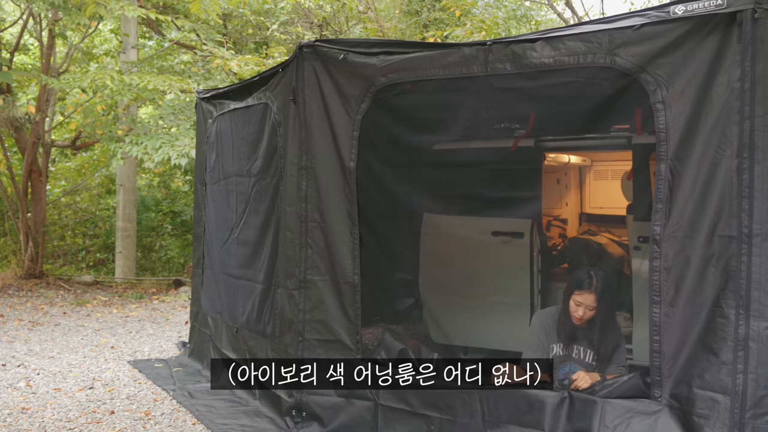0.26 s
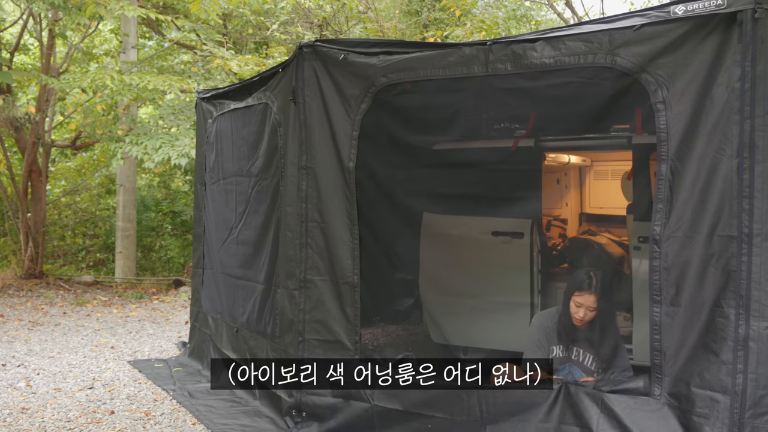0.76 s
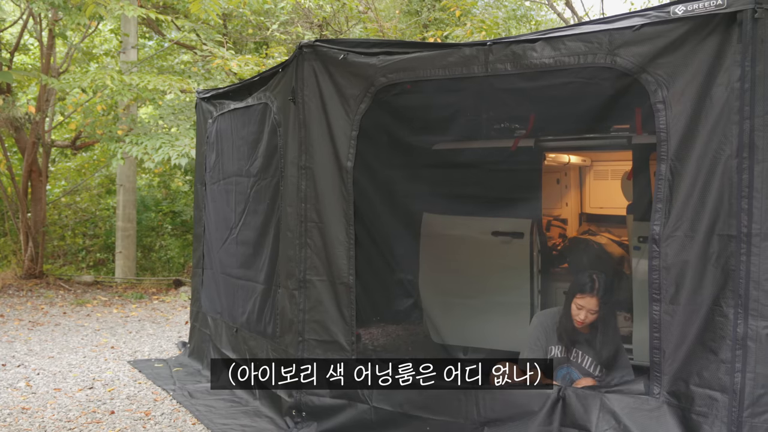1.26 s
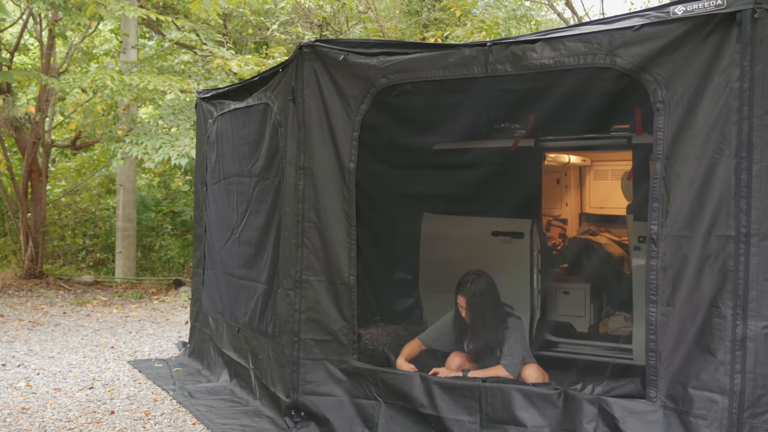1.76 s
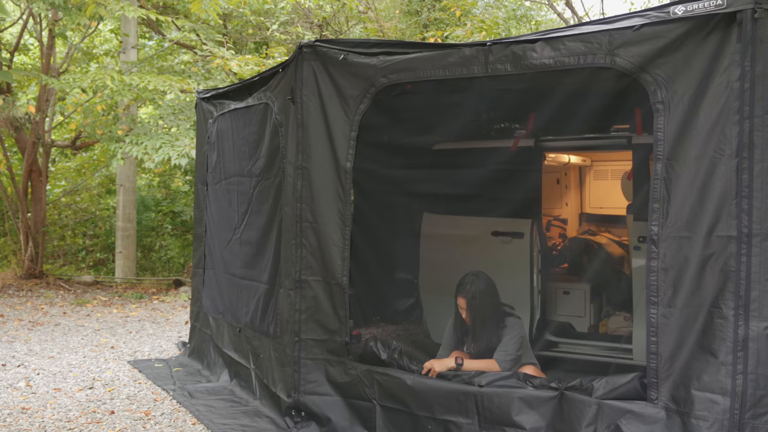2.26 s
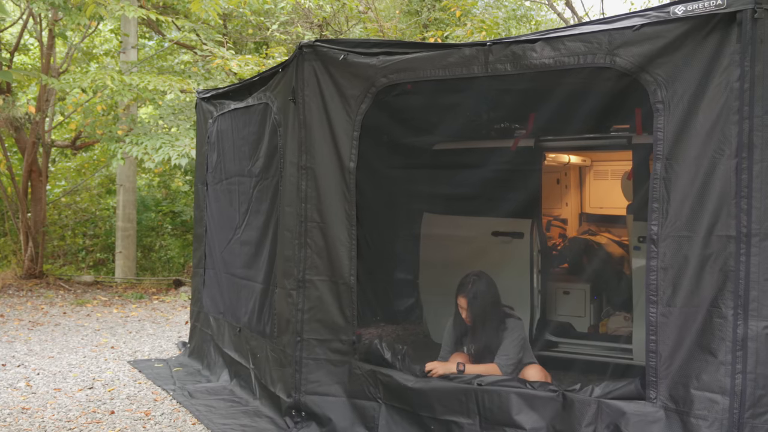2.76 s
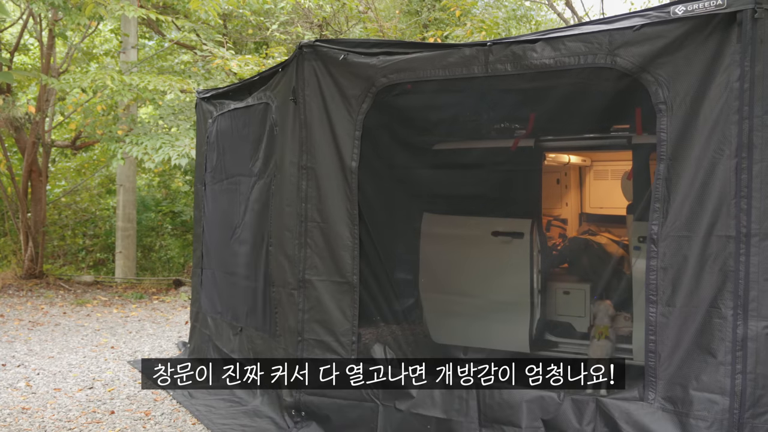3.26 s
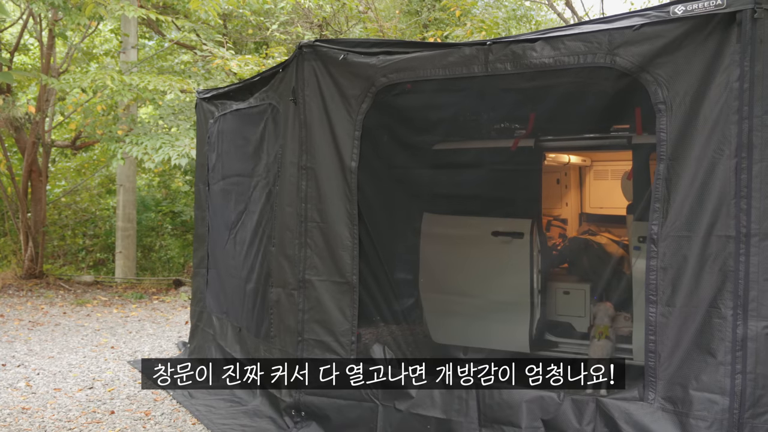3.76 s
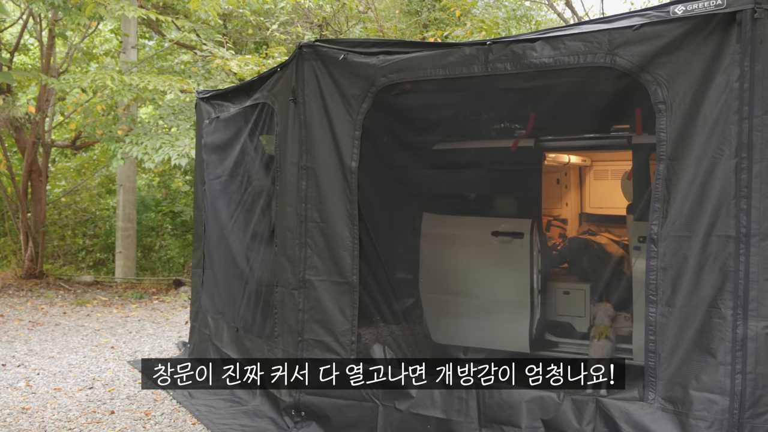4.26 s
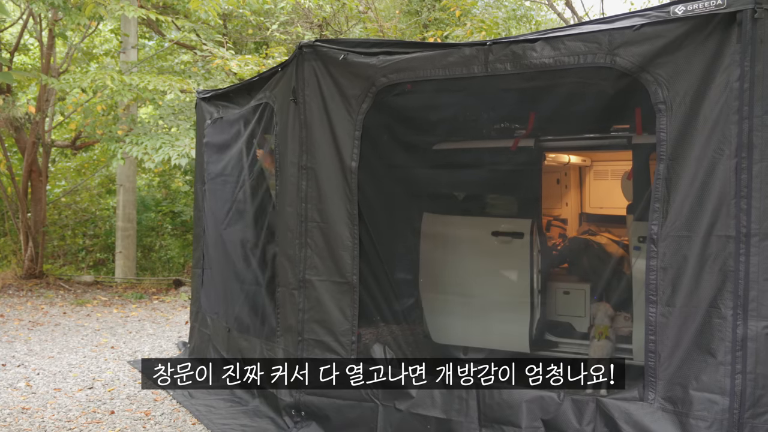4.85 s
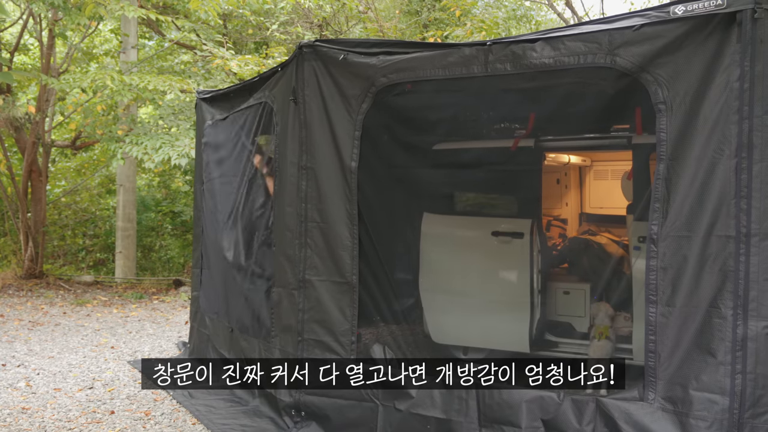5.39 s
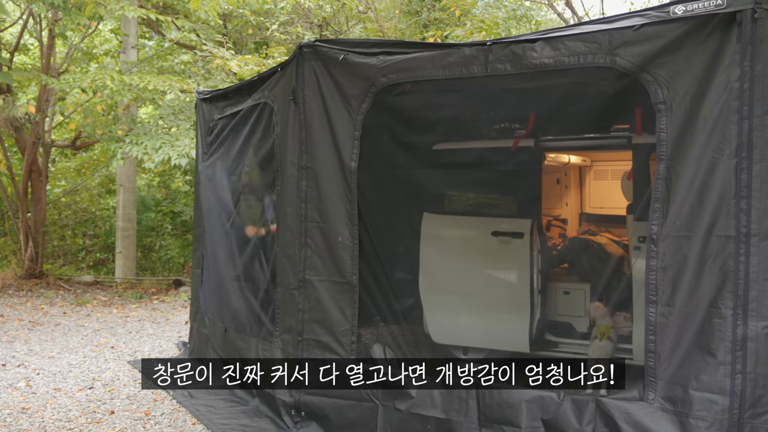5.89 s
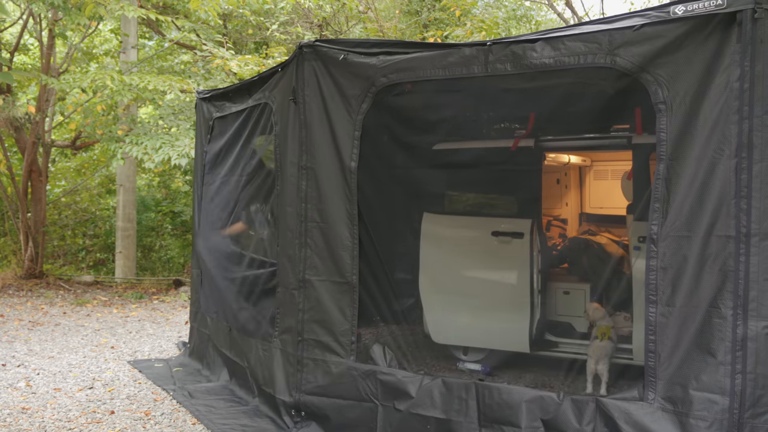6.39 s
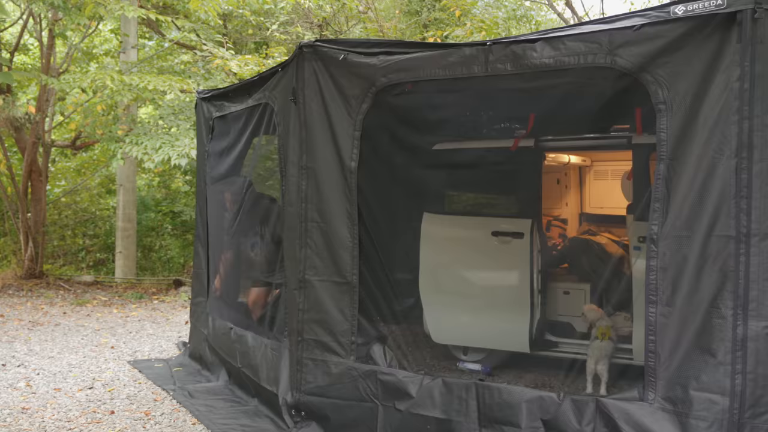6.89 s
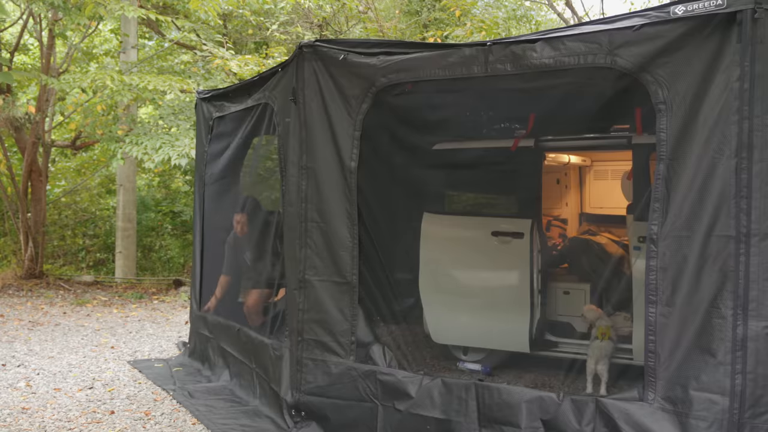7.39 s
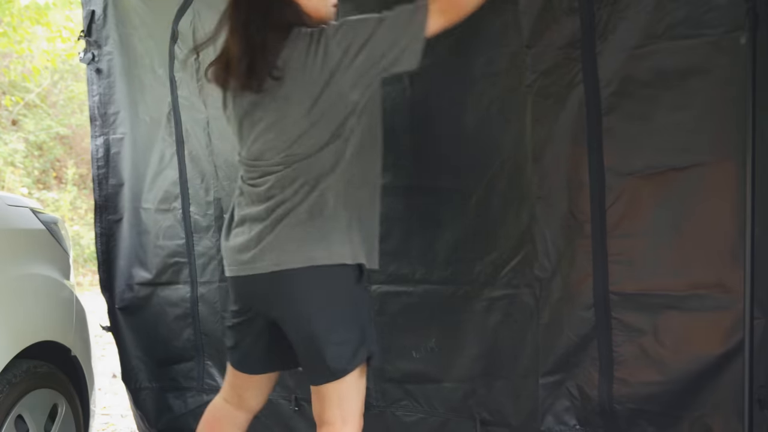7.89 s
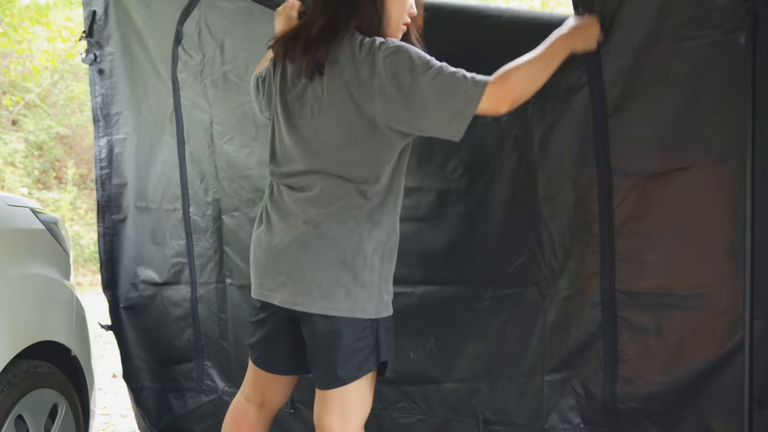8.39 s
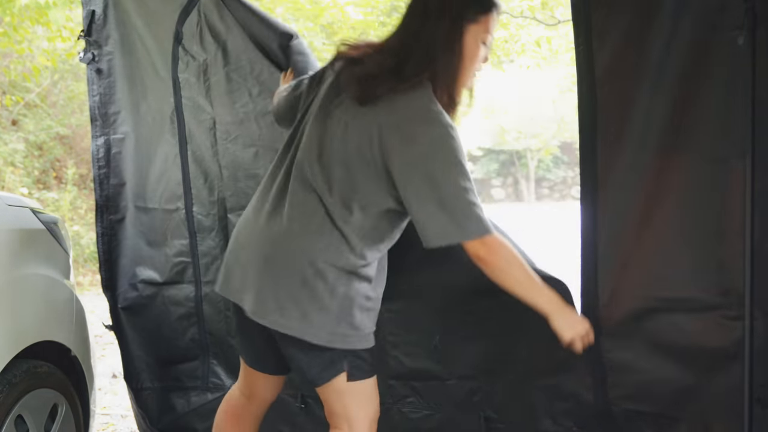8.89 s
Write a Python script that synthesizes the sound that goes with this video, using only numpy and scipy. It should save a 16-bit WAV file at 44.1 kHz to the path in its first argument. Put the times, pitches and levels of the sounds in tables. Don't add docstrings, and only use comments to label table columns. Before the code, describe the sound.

Stiff tent fabric rustles and snaps, then window zippers buzz open in three long runs under a steady high insect drone.

```python
import sys
import numpy as np
from scipy import signal
from scipy.fft import rfft, irfft
from scipy.io import wavfile
from scipy.ndimage import uniform_filter1d

SR = 44100
rng = np.random.default_rng(int(sys.argv[2]) if len(sys.argv) > 2 else 0)


def store_pcm(level_fs):
    pcm = np.round(np.clip(level_fs, -1, 1) * 32767).astype(np.int16)
    wavfile.write(sys.argv[1], SR, np.atleast_2d(pcm).T)


def voltage_ratio(decibels):
    exponent = np.asarray(decibels, float) / 20
    return 10 ** exponent


N = 402633
T = np.arange(N) / SR
LOG_HZ = np.log2(np.arange(N // 2 + 1) * SR / N + 1)
CLOSE_S = 7.605

# t/s, tooth rate f/Hz, grip level/dB rms, edge slope of the partials/dB per octave
FAR_PULLS = [
    [(3.38, 485, -46, -8), (3.45, 892, -43, -21), (3.62, 687, -33.5, -9.5), (3.78, 484, -44, -6),
     (3.936, 464.7, -41, -4), (4.154, 799, -37.5, -8), (4.28, 560, -39, -12), (4.35, 554, -33.5, -5.5),
     (4.5, 360.7, -49, -4)],
    [(5.15, 317, -52, 2), (5.224, 491, -37.5, -7.5), (5.382, 1058, -42, -8), (5.464, 895, -33, -2.5),
     (5.61, 630, -40, 0), (5.7, 410.5, -30.5, -16)],
    [(5.7, 560.5, -54, 5), (5.744, 759, -40, 0), (5.81, 758, -42, 5), (5.866, 917, -32, 0),
     (6.0, 801, -41.5, -4), (6.094, 691, -35, -13), (6.144, 774, -30.5, -10), (6.34, 526, -42.5, -2.5)],
    [(6.34, 523, -36.5, -5), (6.484, 797.5, -41, -1), (6.638, 574, -35.5, -13), (6.68, 479.4, -45, -3.5),
     (6.838, 557, -39, -7), (6.936, 432, -43, -8), (7.1, 170.3, -49, -5)],
]
# t/s, tooth rate f/Hz, grip level/dB rms, edge slope of the partials/dB per octave
CLOSE_PULLS = [
    [(7.605, 497, -37, 1.5), (7.672, 449, -37, -3.5), (7.736, 663, -43, 2), (7.82, 640, -35, 0),
     (7.86, 755, -44.5, 3.5), (8.0, 790, -28, 3), (8.1, 369.9, -25, -7), (8.188, 215, -25.5, -6.5),
     (8.3, 169.6, -39, 0)],
    [(8.3, 166, -39.5, -4.5), (8.416, 503, -25, -6), (8.46, 681, -32.5, 4), (8.52, 897, -38.5, 5),
     (8.588, 1341, -29, 0), (8.7, 1400, -26.5, -0.5), (8.878, 648, -37, -5), (9.056, 615, -39, 3),
     (9.13, 560, -32, 0)],
]
PULLS = [*FAR_PULLS, *CLOSE_PULLS]


def unit(x):
    return x / np.sqrt(np.mean(x ** 2))


def track(tables, column, off=-120.):
    out = np.full(N, off)
    for rows in map(np.array, tables):
        inside = (T >= rows[0, 0]) & (T <= rows[-1, 0] + .006)
        out[inside] = np.interp(T[inside], rows[:, 0], rows[:, column])
    return out


def shaped(x, gain):
    return unit(irfft(rfft(x) * gain, N))


def hump(hz, octaves):
    return np.exp(-((LOG_HZ - np.log2(hz)) / octaves) ** 4)


def ring(hz, width_hz):
    return 1 / (1 + 2j * (2 ** LOG_HZ - hz) / width_hz)


def noise():
    return rng.standard_normal(N)


def walk(rate):
    hold = max(int(SR / rate), 60)
    levels = rng.standard_normal(N // 50)
    return unit(uniform_filter1d(levels[np.arange(N) // hold], hold))


def grains(per_s, spread_db):
    size_db = spread_db * np.minimum(rng.exponential(size=N), 2.5)
    return (rng.random(N) < per_s / SR) * noise() * voltage_ratio(size_db)


def bursts(rows, shift_db=0, release_s=0.075):
    attack_s = 0.033
    power = np.zeros(N)
    for (s, length, db, *_), shift in zip(rows, shift_db + np.zeros(len(rows))):
        rise = np.clip((T - s) / attack_s + .5, 0, 1)
        fade = np.exp(-np.maximum(T - s - length, 0) / release_s)
        power += (voltage_ratio(db + shift) * rise * fade) ** 2
    return np.sqrt(power)


def zipper():
    # f/Hz, width/Hz, lift level/dB
    slider = [(1450, 1250, 3.5), (3870, 420, 4)]
    far_partials = [-1, 2.5, -2, -6, -10, -12]
    close_partials = [0, -1.5, -3.5, -9, -7, -8]
    hz = track(PULLS, column=1, off=300.)
    level_db = track(PULLS, column=2)
    edge_db = track(PULLS, column=3, off=0.)
    waver = 1 + (.05 * walk(400) + .032 * walk(50)) * (450 / hz) ** .5
    turn = 2 * np.pi * np.cumsum(hz * waver) / SR
    tone = 0
    for k in range(1, 7):
        grip_db = 2.2 * walk(30) + 3 * walk(110) - 1
        slip = .14 * (k - 1) * walk(200)
        lift_db = sum(db / (1 + (2 * (k * hz - f) / width) ** 2) for f, width, db in slider)
        partial_db = np.where(T > CLOSE_S, close_partials[k - 1], far_partials[k - 1])
        db = level_db + (edge_db - 1.0) * np.log2(k) + partial_db + lift_db + grip_db
        treble_loss = 1 + (k * hz / 5800) ** 8
        tone = tone + voltage_ratio(db) * np.sqrt(2) * np.cos(k * turn + slip) / treble_loss
    bite = np.clip(voltage_ratio(level_db + 30), 0, .5)
    return tone, 1 + bite * np.cos(turn)


def squeaks():
    # t/s, f/Hz, level/dB
    rising = [(3.53, 1785, -62), (3.648, 2075, -40), (3.71, 2076, -43)]
    high = [(6.82, 2140, -41.5), (6.978, 2357, -49), (6.991, 2360, -52)]
    early = [(2.44, 1450, -62), (2.49, 1700, -56), (2.515, 2020, -56)]
    late = [(7.46, 1150, -63), (7.49, 1403, -46), (7.53, 1603, -63)]
    thin = [(6.73, 2750, -55), (6.79, 2600, -50), (6.83, 2560, -54)]
    low = [(6.891, 1660, -48), (6.944, 1762, -39), (7.12, 1778, -66)]
    out = 0
    for rows in [rising, high, early, late, thin, low]:
        hz = track([rows], column=1, off=1000.) * (1 + 0.0099 * walk(120))
        gain = voltage_ratio(track([rows], column=2) + 2.9 * walk(50))
        out = out + gain * np.sqrt(2) * np.sin(2 * np.pi * np.cumsum(hz) / SR)
    return out


def tabs():
    # t/s, length/s, level/dB rms
    far_shakes = [(3.6, 0.092, -65), (4.3, 0.24, -54), (5.82, 0.42, -52), (6.65, .11, -47),
                  (6.95, 0.15, -44.5), (7.28, .08, -54)]
    # t/s, length/s, level/dB rms
    close_shakes = [(7.84, 0.046, -44), (7.99, 0.054, -24), (8.1, 0.13, -24), (8.24, 0.039, -18),
                    (8.39, 0.096, -25.5), (8.54, 0.11, -20.5), (8.67, 0.05, -28), (8.75, 0.059, -35),
                    (8.93, 0.14, -30)]
    knocks = grains(900, 0.61)
    running, close = track(PULLS, column=2) > -100, T > CLOSE_S
    far = np.hypot(voltage_ratio(-64) * running * ~close, bursts(far_shakes))
    shaken = bursts(close_shakes, release_s=0.018)
    high = np.hypot(voltage_ratio(-79) * close, shaken)
    low = np.hypot(voltage_ratio(-37) * close, voltage_ratio(-10) * shaken)
    far_ring = shaped(knocks, ring(hz=13390, width_hz=70))
    high_ring = shaped(knocks, ring(hz=13840, width_hz=85))
    low_ring = shaped(knocks, ring(hz=5700, width_hz=110))
    return voltage_ratio(7.5) * far * far_ring + voltage_ratio(-2.0) * (high * high_ring + low * low_ring)


def cloth(teeth):
    # centre f/Hz, half width/octaves, range (0 rustle, 1 flap, 2 crinkle, 3 sheen)
    bands = [(350, .7, 0), (750, .5, 0), (1300, .5, 0), (150, .8, 1), (2200, .5, 2), (3800, .55, 2),
             (10000, 1.2, 3)]
    trims = [-14, -11, -10, -5, -4.5, -6.5, 1]
    close_trims = [-0.5, 0.5, -0.5, -3, -1.5, 3.5, 7]
    patchy = [2.8, 3.3, 2.2, 1.43]
    # t/s, length/s, rustle level/dB rms, flap and crinkle level/dB to the rustle
    handling = [(0.0, 0.38, -51, -4, -8), (0.405, 0.47, -44, -11.5, -10.5), (.95, .6, -57, -2, -12),
                (1.565, 0.15, -40, -13, -9.5), (1.778, 0.18, -41, -12, -7.5), (2.055, 1, -61, -6, 4),
                (2.537, 0.066, -48.5, -13, -10), (2.748, 0.12, -44.5, -8, -5),
                (2.954, 0.32, -42.5, -13, -10), (3.32, 0.068, -53, -20, -5), (4.498, 0.15, -45.5, -15, -10),
                (4.68, 0.21, -43, -20, -12), (4.938, .2, -51, -15, -2.5), (5.171, 0.12, -42, -9, -10),
                (6.1, .4, -38.5, -8.5, -24), (6.95, 0.63, -44, -14, -12.5), (7.243, 0.067, -42, -5, -9),
                (8.152, 0.17, -43, 8.5, -18), (8.421, .08, -36, -23, 2.5), (8.5, 0.58, -47, 2, -1),
                (5.598, 0.32, -38.5, -18, 0.5), (4.1, 0.13, -53.5, -20, 12.5),
                (7.905, 0.18, -28.5, -25, -7)]
    tape = [-40, -41, -37, -38, -30.5, -31.5]
    tape_rise = [5.5, -6.5, 4.5, 4]
    tape_ranges = [-0.5, -20, -3, -5.5]
    flap_db, crinkle_db = np.array(handling)[:, 3:].T
    sheen_db = crinkle_db - 0.5
    hands = [bursts(handling, db) for db in (0, flap_db, crinkle_db, sheen_db)]
    spans = [[(rows[0][0], db), (rows[-1][0], db)] for rows, db in zip(PULLS, tape)]
    tape_db = track(spans, column=1)
    speed = uniform_filter1d(np.log2(track(PULLS, column=1, off=400.) / 600), size=2000)
    late = np.interp(T - 0.023, T, speed)
    rub = rfft(noise() + .45 * unit(grains(600, 3.0)))
    out = 0
    for (hz, octaves, k), trim_db, close_db in zip(bands, trims, close_trims):
        speed_db = tape_rise[k] * (late if k == 3 else speed)
        drag_db = tape_db + tape_ranges[k] + speed_db + close_db * (T > CLOSE_S)
        drag = uniform_filter1d(voltage_ratio(drag_db), size=200)
        gain = np.hypot(hands[k], drag) * voltage_ratio(trim_db + patchy[k] * walk(18))
        patch = unit(irfft(rub * hump(hz, octaves), N))
        out = out + gain * patch * (teeth if k > 1 else 1)
    return out


def creases():
    # t/s, peak level/dB, ring f/Hz, treble level/dB to the peak
    snaps = [(0.08, -30, 854, -14), (0.218, -25, 1040, -21), (0.382, -24.5, 960, -14),
             (0.419, -27, 1020, -23), (0.492, -31, 885, -13), (0.562, -29, 915, -14),
             (0.671, -27, 920, -18), (0.705, -32, 1090, 0), (0.772, -21.5, 1130, -31),
             (0.874, -22.5, 770, -37), (1.172, -38, 895, -20), (1.589, -32, 999, -18),
             (1.633, -19.5, 980, -6), (1.87, -28, 1180, -16), (1.929, -26, 900, -8), (1.948, -27, 1350, -6),
             (2.058, -25, 1090, -25), (2.579, -36, 1000, -16), (2.761, -38, 406, -15),
             (2.796, -33, 800, -8), (2.827, -28, 1080, -11), (3.256, -31, 405, -7), (3.442, -22, 891, -22),
             (4.594, -28, 1710, -10), (4.643, -30, 1240, -9), (4.7, -26.5, 810, -25),
             (4.738, -31, 533, -24), (4.774, -26, 960, -20), (4.884, -24, 1600, -16),]
    out, t = np.zeros(N + 4000), np.arange(4000) / SR
    scraps = rng.standard_normal((len(snaps), 4000))
    for (s, db, hz, treble_db), scrap in zip(snaps, scraps):
        knock = np.sin(2 * np.pi * hz * t) * np.exp(-t * hz / 2)
        tick = voltage_ratio(treble_db + 8) * scrap * np.exp(-t / .0006)
        rustle = uniform_filter1d(scrap, size=10) - uniform_filter1d(scrap, size=70)
        tail = .5 * rustle * np.exp(-t / 0.01)
        i = int(s * SR)
        out[i:i + 4000] += voltage_ratio(db - 0.5) * (knock + tick + tail)
    return out[:N]


def walls(near):
    t = np.arange(6000) / SR
    bounces = rng.standard_normal(6000) * np.exp(-t / 0.029) * (t > .004)
    return signal.fftconvolve(near, bounces / np.sqrt(np.sum(bounces ** 2)))[:N]


def singer(hz, width_hz, crowd_hz, octaves, per_s, depth, crowd_db):
    turn = 2 * np.pi * np.cumsum(per_s * (1 + 0.011 * walk(3.24))) / SR
    burst = np.exp(4 * (np.cos(turn) - 1))
    core = shaped(noise(), ring(hz, width_hz))
    crowd = shaped(noise(), hump(crowd_hz, octaves))
    throb = 1 + depth * voltage_ratio(2.5 * walk(2.5)) * burst
    return unit(throb * (core + voltage_ratio(crowd_db) * crowd))


def drone():
    # from t/s, low singer level/dB, high singer level/dB
    stretches = [
        (0.0, -34.5, -41),
        (1.572, -34.5, -40),
        (3.375, -34.5, -39),
        (7.6, -33, -41),
    ]
    start, *levels = np.transpose(stretches)
    low_db, high_db = (db[np.searchsorted(start, T, side="right") - 1] for db in levels)
    low = singer(6630, 110, crowd_hz=6720, octaves=.085, per_s=28.8, depth=0.87, crowd_db=-1.5)
    high = singer(8830, 200, crowd_hz=8600, octaves=.1, per_s=37.4, depth=0.54, crowd_db=0.0)
    return voltage_ratio(low_db - 2.0) * low + voltage_ratio(high_db - 2.0) * high


def chirper():
    # t/s, level/dB
    chirps = [(0.0283, -47), (0.2, -37), (0.6828, -36), (0.832, -40), (0.987, -40), (1.1408, -41),
              (1.3144, -41), (1.4726, -39), (1.66, -40), (1.8153, -42), (1.9779, -41), (2.1176, -40),
              (2.272, -40), (2.4897, -50), (2.692, -46), (3.16, -40)]
    swell = 0
    for s, db in chirps:
        swell = swell + voltage_ratio(db - 5.5) * np.sin(np.pi * np.clip((T - s + 0.019) / 0.11, 0, 1))
    return swell * (shaped(noise(), ring(5070, 500) ** 2) + voltage_ratio(-9) * shaped(noise(), ring(10200, 900) ** 2))


def striped_trill():
    # t/s, throb rate f/Hz
    throbs = [(3.38, 13.8), (5.22, 11.5), (7.32, 12), (7.59, 12)]
    # multiple, level/dB
    partials = [(12, -5), (13, 0), (14, -2), (15, -2)]
    strokes = 2 * np.pi * np.cumsum(380.7 * (1 + .0025 * walk(60))) / SR
    beat = 1 + 0.48 * np.sin(2 * np.pi * np.cumsum(track([throbs], column=1, off=13.33)) / SR + 1.1)
    lines = sum(voltage_ratio(db + 2 * walk(25)) * np.sin(k * strokes) for k, db in partials)
    blur = voltage_ratio(-7) * shaped(noise(), hump(5100, .16))
    singing = track([throbs], column=1) > 0
    return voltage_ratio(-51.5 + 1.5 * walk(4)) * singing * beat * (lines + blur)


def insects():
    # t/s, length/s, level/dB rms
    rasps = [
        (7.61, 1.32, -56),
        (8.09, 0.16, -28),
        (8.52, 0.23, -41),
        (8.91, .15, -29),
    ]
    # t/s, length/s, level/dB rms
    hummer = (.85, .7, -58)
    rasp = bursts(rasps) * voltage_ratio(1.5 * walk(60)) * shaped(noise(), hump(15100, .12))
    hum = bursts([hummer]) * shaped(noise(), hump(3970, 0.12))
    return drone() + chirper() + striped_trill() + rasp + hum


def woods():
    # f/Hz, level/dB per Hz
    spectrum = [(18, -55), (35, -48), (65, -10), (150, -23.5), (460, -15), (940, -21), (2100, -28.5),
                (3100, -30), (4200, -21), (5800, -16), (7600, -10.5), (9700, -26.5), (11500, -19.5),
                (13700, -14.5), (16000, -19)]
    hz, db = np.transpose(spectrum)
    air = irfft(rfft(noise()) * voltage_ratio(np.interp(LOG_HZ, np.log2(hz), db)), N)
    bass = irfft(rfft(air) * (LOG_HZ < 12), N)
    return voltage_ratio(-52 + .7 * walk(1.5)) * air / np.std(bass)


def scene():
    tone, teeth = zipper()
    near = tone + squeaks() + tabs() + cloth(teeth) + creases()
    return (near + voltage_ratio(-10) * walls(near) + insects() + woods())[None]


def band_limit(x):
    return signal.sosfilt(signal.butter(12, 16890, fs=SR, output="sos"), x)


def record(dry):
    rounded = .6 * np.tanh(dry / .6)
    top_cut = signal.ellip(10, .2, 80, 15750, fs=SR, output="sos")
    mix = signal.sosfilt(top_cut, rounded)
    return band_limit(mix)


dry = scene()
out = record(dry)
store_pcm(out)
```